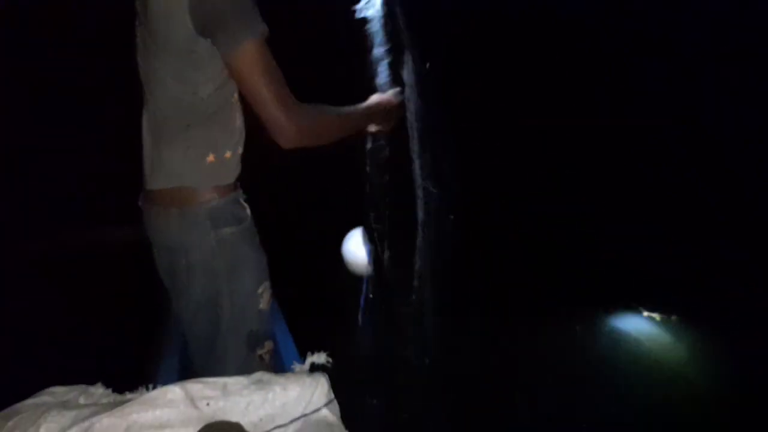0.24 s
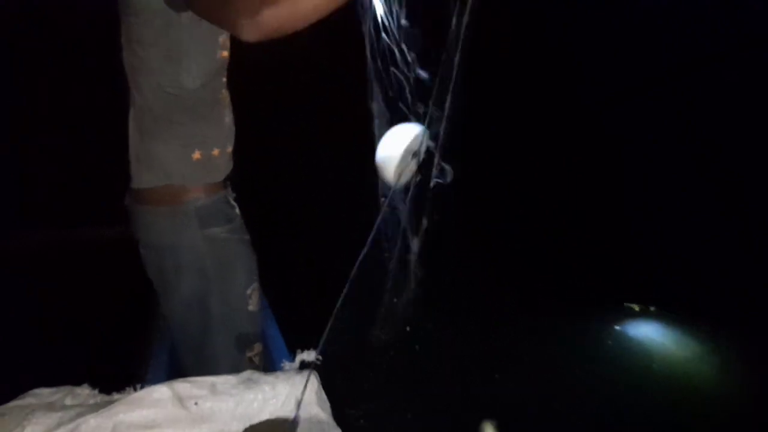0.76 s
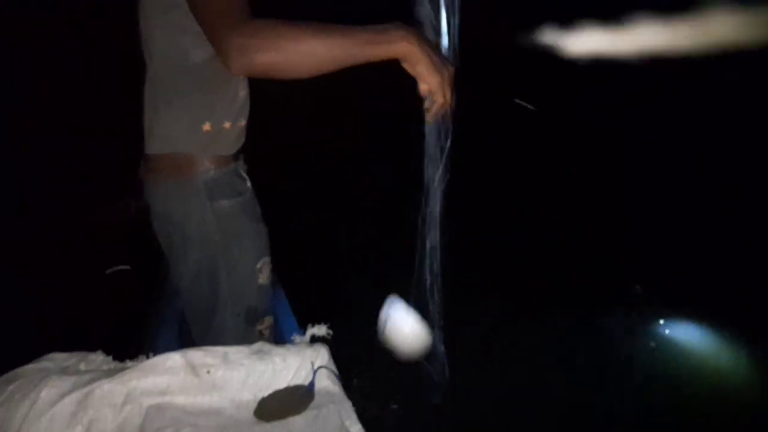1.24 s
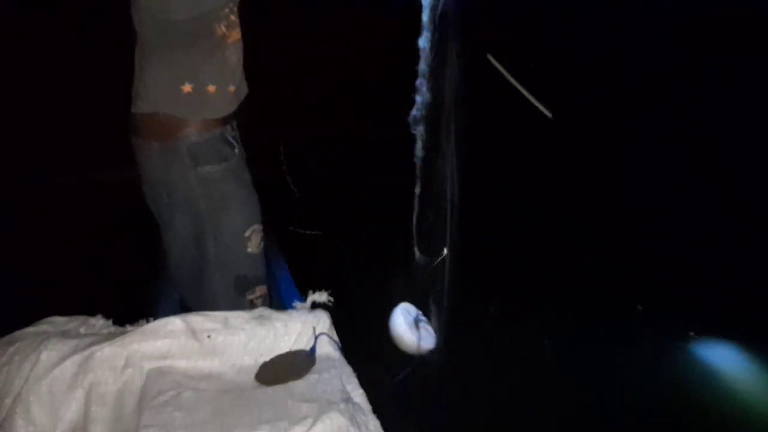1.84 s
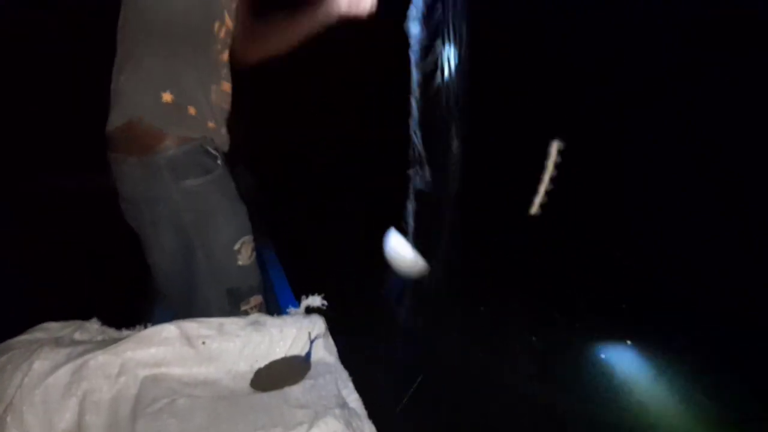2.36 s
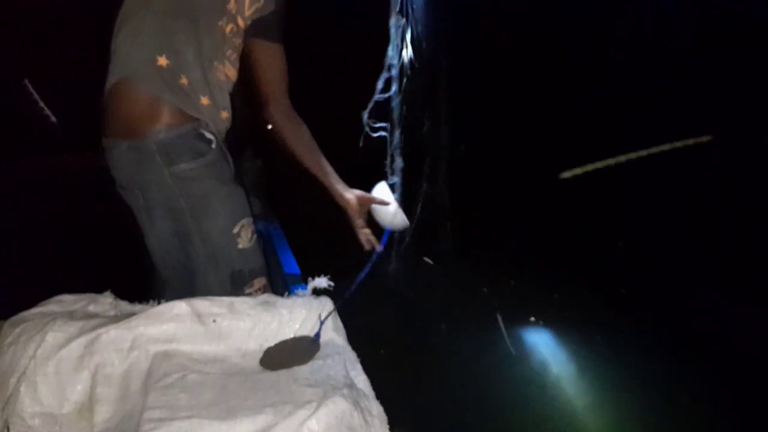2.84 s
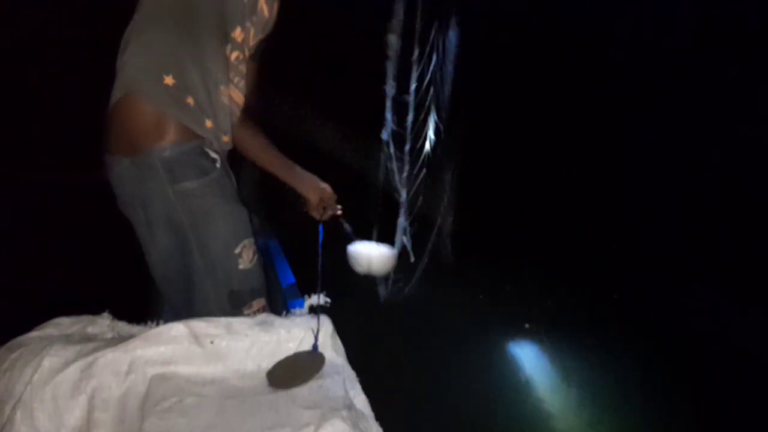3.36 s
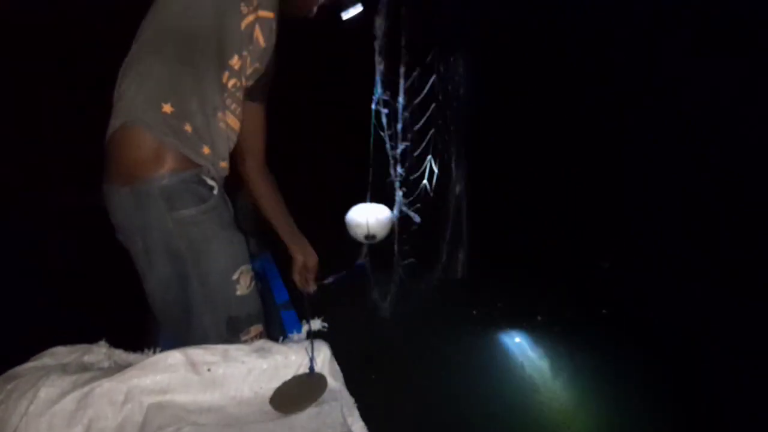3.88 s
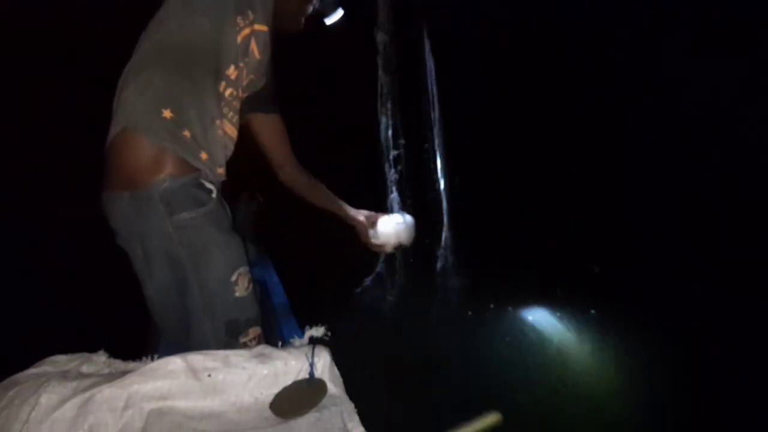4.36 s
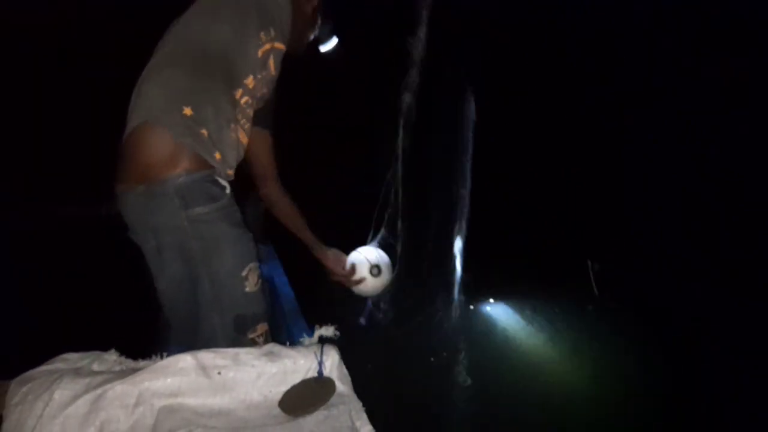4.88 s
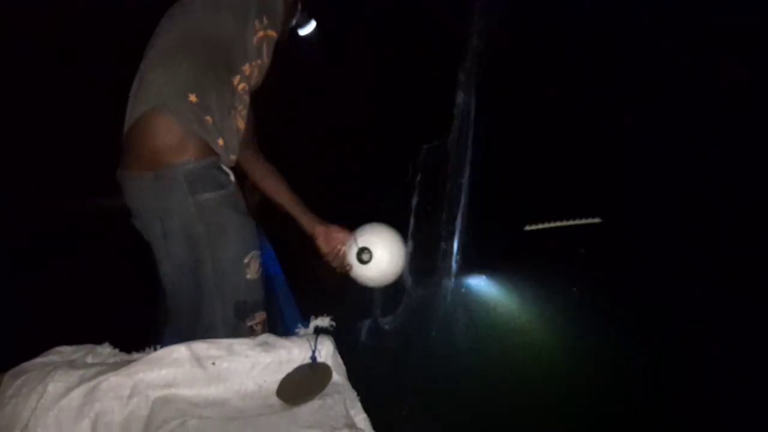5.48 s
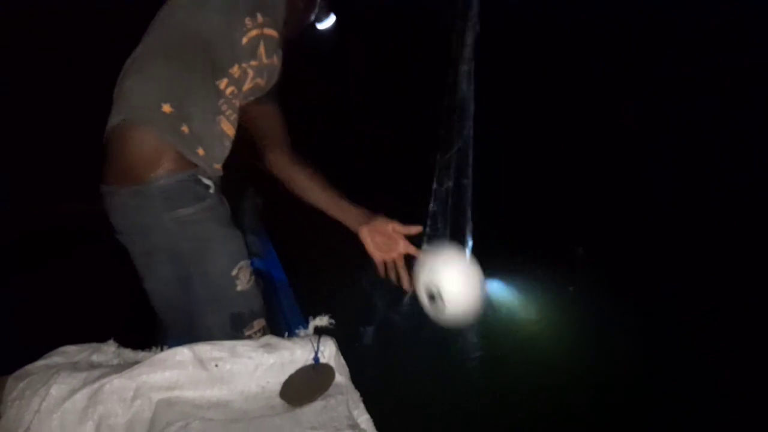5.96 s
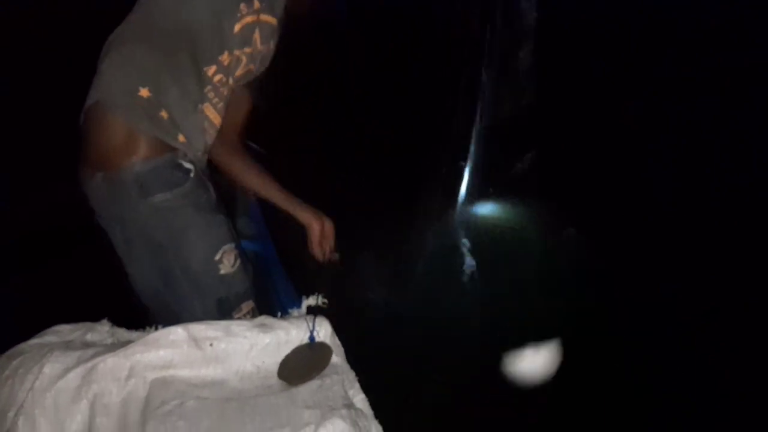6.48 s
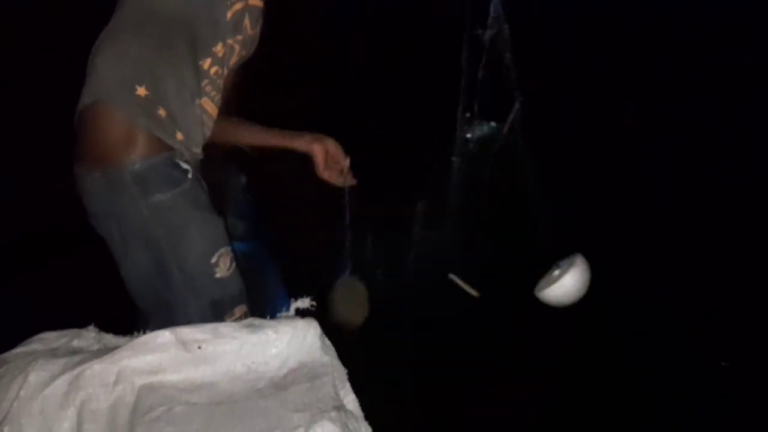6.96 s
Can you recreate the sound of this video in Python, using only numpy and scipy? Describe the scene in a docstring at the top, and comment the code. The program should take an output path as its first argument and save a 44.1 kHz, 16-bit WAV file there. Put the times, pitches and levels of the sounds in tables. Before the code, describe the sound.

Wet fishing net rustles and sprays as it is hauled into a small boat at night, strands snapping, folds slapping the hull, crickets chirping steadily.

```python
"""A wet fishing net is hauled by hand into a small boat on a river at night.
From the start: mesh rustle and spray (filtered clicks), low rumble and open air (shaped noise), and insects
on the right bank (swelling, falling tones and shaped noise). Drops (rising tones and splats) fall throughout.
Strands then snap (noise bursts) and wet folds slap the hull (ringing modes and squelch).
Later a plastic float knocks (scraped modes) and a cord swishes (narrow resonances of noise)."""
import sys
import numpy as np
from scipy import signal
from scipy.fft import rfft, irfft
from scipy.io import wavfile
from scipy.ndimage import uniform_filter1d

SR = 44100
rng = np.random.default_rng(int(sys.argv[2]) if len(sys.argv) > 2 else 0)


def materialize(psi):
    """Save the field psi as 16-bit PCM at rate SR to the path in sys.argv[1].

    A 1-D psi becomes a single channel; in a 2-D psi each row is a channel.
    """
    bounded = np.clip(np.atleast_2d(psi).T, -1, 1)
    quanta = np.round(bounded * 32767).astype(np.int16)
    wavfile.write(sys.argv[1], SR, quanta)


N = 318132
TIME = np.arange(N) / SR


def amp(db):
    """Amplitude factor of a level in dB."""
    return 10 ** (np.asarray(db) / 20)


def unit(x):
    """Scale to RMS 1."""
    return x / np.sqrt(np.mean(x ** 2))


def colour(x, points):
    """Filter by a spectrum of (Hz, dB) points, joined over log frequency."""
    hz, db = np.transpose(points)
    f = np.maximum(np.fft.rfftfreq(N, 1 / SR), 1)
    gain = amp(np.interp(np.log(f), np.log(hz), db))
    return irfft(rfft(x) * gain, N)


def resonate(x, hz, width_hz):
    """One resonance, gain 1 at its centre."""
    return signal.lfilter(*signal.iirpeak(hz, hz / width_hz, SR), x)


def walk(rate_hz):
    """Slow random curve, RMS 1."""
    k = int(SR / rate_hz)
    steps = np.repeat(rng.standard_normal(N // k + 1), k)
    return unit(uniform_filter1d(steps, k)[:N])


def pan(left_minus_right_db):
    """Gains of the two channels for a level difference."""
    return amp(np.array([[left_minus_right_db], [-left_minus_right_db]]) / 2)


def noise(alike, size=N):
    """Two channels of white noise; alike is the shared share of power, 0 to 1."""
    shared, *own = rng.standard_normal((3, size))
    return np.sqrt(alike) * shared + np.sqrt(1 - alike) * np.array(own)


def density_noise(alike, points):
    """Noise shaped by a density of (Hz, dB per Hz) points."""
    return colour(noise(alike), points) * np.sqrt(SR / 2)


def add(track, s, sound):
    """Mix a sound in at time s."""
    i = max(int(s * SR), 0)
    part = sound[..., :max(N - i, 0)]
    track[..., i:i + part.shape[-1]] += part


def scatter(x, t60_s, wet_db):
    """Diffuse reflections from boat, water and bank, different at each ear."""
    t = TIME[:SR // 2]
    tail = noise(0, size=len(t)) * amp(-60 * t / t60_s)
    tail /= np.sqrt(np.sum(tail ** 2, axis=1, keepdims=True))
    wet = signal.fftconvolve(np.atleast_2d(x), tail, axes=1)[:, :N]
    return x + amp(wet_db) * wet


def crackle(rate_hz, spread_db, alike):
    """Dense tiny clicks of very unequal size."""
    sizes = amp(spread_db * np.minimum(rng.exponential(size=N), 4))
    hits = rng.random(N) < rate_hz / SR
    return unit(noise(alike) * sizes * hits)


def ring(modes, t, fall_db_per_decade=0, detune=0.049):
    """Modes of a struck body; each blow wakes them a little differently."""
    hz, db, t60_s = np.transpose(modes)[:, :, None]
    chance = rng.standard_normal((2, len(modes), 1))
    tilt_db = -fall_db_per_decade * np.log10(hz / hz[0])
    gain = amp(db + 2 * chance[0] + tilt_db - 60 * t / t60_s)
    return np.sum(gain * np.sin(2 * np.pi * hz * (1 + detune * chance[1]) * t), axis=0)


def stroke(hz, fall, length_s):
    """One wing stroke of an insect: a quickly swelling tone that sinks as the wing slows."""
    u = np.linspace(0, 1, int(length_s * SR))
    phase = 2 * np.pi * np.cumsum(hz * (1 - fall * u ** 1.5)) / SR
    return np.sin(np.pi * u ** .75) * np.sin(phase)


def strike(t, rise_s, t60_s):
    """Envelope of a wet contact: a short swell, then a decay."""
    return (1 - np.exp(-t / rise_s)) * amp(-60 * t / t60_s)


def beats(first_s, last_s, rate_hz):
    """Evenly spaced times from first to last, at about this rate."""
    return np.linspace(first_s, last_s, int(round((last_s - first_s) * rate_hz)) + 1)


def slide(start_s, rise_s, hold_s, swell_db=21, t60_s=0.21):
    """Envelope of a length of net: it swells as it gathers speed, runs, and fades when let go."""
    t = np.maximum(TIME - start_s, 0)
    swell = -swell_db * np.maximum(1 - t / rise_s, 0)
    fade = -60 * np.maximum(t - rise_s - hold_s, 0) / t60_s
    return amp(swell + fade) * (t > 0)


# Lengths of net sliding through the hands. Each row: start in seconds, gathering speed in seconds,
# at full speed in seconds, mesh rustle in dB, spray in dB, both before trim.
PULLS = [(0.0, .02, 0.065, -57, -68), (0.170, 0.005, 0.17, -60, -57.5), (0.18, 0.23, .11, -45, -51),
         (0.45, 0.11, 0.022, -41, -48), (0.558, 0.012, .004, -43, -54.5), (0.599, 0.04, 0.25, -41.5, -43),
         (0.733, .008, 0.0075, -66, -43.5), (0.98, 0.063, 0.27, -68, -62), (3.293, 0.0072, 0.22, -51, -51),
         (3.33, 0.077, .008, -49, -56), (3.72, .04, .36, -67.5, -65), (4.935, 0.01, .015, -48, -60),
         (4.97, .05, 0.38, -63.5, -53), (5.14, 0.15, 0.028, -53, -52), (6.36, .12, .04, -67, -63),
         (6.682, 0.13, 0.034, -41.5, -48.5), (6.874, 0.044, 0.0091, -40, -45.5)]
# Rustle spectrum. Each row: frequency in Hz, relative level in dB.
MESH_SPECTRUM = [(60, 8), (140, 1.5), (300, 6), (550, -1.5), (820, 5.5), (1200, -2), (1900, 2.5), (2700, 1),
                 (3700, -6.5), (5300, -0.5), (8000, -34), (15000, -28)]
# Rustle placement. Each row: frequency in Hz, left minus right in dB.
MESH_PAN = [(150, -4), (700, 0.5), (1200, 17.5), (2400, -16), (5000, -12.5)]
# Spray spectrum. Each row: frequency in Hz, relative level in dB.
SPRAY_SPECTRUM = [(1000, -19), (2800, 2.5), (3700, -2.5), (5200, 5), (7000, -2), (10000, -0.5), (12000, 5),
                  (15000, 3)]


def net(count=7):
    """Wet strands of every thickness rub, each in its own band, and shed a fizz of fine spray."""
    mesh_gain, spray_gain = 0, 0
    for start_s, rise_s, hold_s, mesh_db, spray_db in PULLS:
        pull = slide(start_s, rise_s, hold_s)
        mesh_gain = mesh_gain + amp(mesh_db) * pull
        spray_gain = spray_gain + amp(spray_db) * pull
    mesh = 0
    for hz in np.geomspace(130, 5200, count):
        strands = resonate(crackle(rate_hz=2500, spread_db=2.0, alike=0.63), hz, 0.52 * hz)
        mesh = mesh + strands * amp(2.0 * walk(70)) * pan(np.interp(hz, *np.transpose(MESH_PAN)))
    mesh = unit(colour(mesh, MESH_SPECTRUM)) * mesh_gain * amp(3.5 + 2.1 * walk(60))
    spray = unit(colour(crackle(rate_hz=12000, spread_db=2.5, alike=0.059), SPRAY_SPECTRUM))
    return mesh + spray * spray_gain * amp(9.5 + 1.2 * walk(50)) * pan(-3.5)


# Rumble spectrum. Each row: frequency in Hz, density in dB per Hz before the level curve.
RUMBLE_SPECTRUM = [(20, -85), (40, -74.5), (58, -72.5), (76, -69.5), (105, -74.5), (170, -88.5),
                   (280, -90.5), (500, -102), (1500, -120)]
# Rumble level curve. Each row: time in seconds, gain in dB.
RUMBLE_LEVEL = [(0, 0), (2.9, 0.5), (3.7, 2), (5.7, 3.5), (6.15, -2), (7.2, 4)]


def rumble():
    """Low noise, nearly alike in both channels, with an unsteady level."""
    level_db = np.interp(TIME, *np.transpose(RUMBLE_LEVEL))
    return density_noise(0.88, RUMBLE_SPECTRUM) * amp(level_db + 2.0 * walk(8.8))


# Open air. Each row: frequency in Hz, mean density in dB per Hz.
AIR_SPECTRUM = [(100, -92), (280, -88), (500, -95), (820, -92.5), (1300, -99), (3000, -99), (6000, -102),
                (8500, -98), (10500, -106), (15000, -106)]


def open_air():
    """Wide, faint noise with a slightly wavering level."""
    return density_noise(0.15, AIR_SPECTRUM) * amp(1.0 * walk(20))


# Far insects. Each row: frequency in Hz, mean density in dB per Hz before panning.
CHORUS_SPECTRUM = [(1200, -116), (2100, -100), (2800, -91), (3200, -87.5), (3650, -99), (4350, -87.5),
                   (5000, -92.5), (6100, -98), (8000, -103), (9600, -91.5), (10400, -100), (12500, -96.5),
                   (15000, -102)]


def far_insects():
    """Many insects blur into peaked noise that shimmers on the right bank."""
    shimmer_db = 1.42 * walk(6) + 2.22 * walk(70)
    return density_noise(0.071, CHORUS_SPECTRUM) * amp(shimmer_db) * pan(-10.5)


# Stretches of even chirping. Each row: first chirp in seconds, last chirp in seconds, relative strength in dB.
CHIRPS = [(0.049, 0.508, -4), (0.619, 1.610, -1.5), (1.729, 4.857, 0), (4.976, 5.973, -1.5),
          (6.272, 7.153, -3.5)]


def near_cricket(chirps_hz=8.95, level_db=-41):
    """Two falling wing strokes a chirp, about nine chirps a second."""
    out = np.zeros(N)
    for first_s, last_s, db in CHIRPS:
        for s in beats(first_s, last_s, chirps_hz):
            a, b = rng.standard_normal(2)
            opening = stroke(hz=4690 + 25 * a, fall=0.16, length_s=0.01355)
            closing = stroke(hz=4640 + 25 * b, fall=0.14, length_s=0.0144)
            add(out, s - .0050, amp(db + .8 * a) * opening)
            add(out, s + .0122, amp(db + 0.94 * b) * closing)
    out += amp(-7.5) * np.roll(out, int(.0036 * SR))  # mirrored by the water
    return scatter(out, t60_s=.15, wet_db=-11) * amp(level_db) * pan(-9.0)


# Stretches of evenly spaced bursts. Each row: first burst in seconds, last burst in seconds.
BURSTS = [(0.051, 2.273), (2.394, 4.441), (4.568, 5.457), (5.580, 7.181)]


def bush_cricket(count=9, bursts_hz=8.15, ticks_hz=128):
    """Bursts of thin high ticks that swell and fade."""
    out = np.zeros(N)
    for s in np.concatenate([beats(first_s, last_s, bursts_hz) for first_s, last_s in BURSTS]):
        for k, (a, b) in enumerate(rng.standard_normal((count, 2))):
            place = k - (count - 1) / 2
            tick_s = s + place / ticks_hz + 0.00034 * a
            gain = amp(-49.5 - 0.1 * place ** 2 + 1.0 * b)
            add(out, tick_s, gain * stroke(hz=9760, fall=0.063, length_s=0.0038))
    return scatter(out, t60_s=0.19, wet_db=-11) * pan(-13.5)


# Stretches of evenly spaced runs of ticks. Each row: first run in seconds, last run in seconds.
RUNS = [(0.10, 3.24), (3.69, 3.69), (4.105, 6.99)]


def far_cricket(count=4, runs_hz=3.8, tick_gap_s=0.038):
    """A fainter cricket ticks in short runs."""
    out = np.zeros(N)
    for s in np.concatenate([beats(first_s, last_s, runs_hz) for first_s, last_s in RUNS]):
        for k in range(count):
            tick = stroke(hz=6450 + rng.normal(0, 45), fall=0.055, length_s=0.013)
            add(out, s + k * tick_gap_s - .004, amp(rng.normal(0, 2.8)) * tick)
    return scatter(out, t60_s=0.11, wet_db=4) * amp(-58.5) * pan(-4)


# Larger drops falling on the river. Each row: time in seconds, starting bubble pitch in Hz.
DRIPS = [(1.072, 3030), (1.418, 1720), (1.488, 920), (1.792, 1260), (1.907, 850), (2.704, 1900),
         (3.155, 1030), (3.185, 860), (3.743, 1330), (4.191, 1650), (4.361, 980), (4.451, 1020),
         (4.588, 1350), (4.718, 1020)]


def drips(level_db=-47.5, small_count=60):
    """Each drop splats and traps a bubble whose pitch rises as it dies; random ones patter in between."""
    out, t = np.zeros(N), TIME[:SR // 10]
    drops = [(s, level_db, hz) for s, hz in DRIPS]
    for a, b, c in rng.random((small_count, 3)):
        drops.append((a * TIME[-1], -60 + 7 * b, 850 * 2 ** (1.2 * c)))
    for s, db, hz in drops:
        bubble = np.sin(2 * np.pi * hz * t * (1 + 2.4 * t)) * strike(t, rise_s=0.0016, t60_s=0.039)
        splat = resonate(rng.standard_normal(len(t)), 1.37 * hz, 1.9 * hz)
        splat = splat * strike(t, rise_s=0.00089, t60_s=0.027)
        add(out, s, amp(db) * (amp(-5.5) * bubble + amp(10.0) * splat))
    return scatter(out, t60_s=0.13, wet_db=3.5) * pan(-0.88)


# Strands snapping free. Each row: time in seconds, level in dB, treble share in dB, both before trim.
SNAPS = [(0.177, -34, -6), (0.552, -12, -23), (0.572, -17, -20), (0.874, -19.5, -24), (1.072, -35, -15),
         (3.298, -40, -10), (3.396, -23, -33), (4.591, -33, -4.5), (5.492, -49, -2), (6.697, -32, -6),
         (6.761, -40, -4), (6.787, -23, -17), (6.842, -28, -24), (6.877, -25, -15), (6.897, -16, -16.5),
         (6.928, -26.5, -1.5)]


def snaps():
    """A taut strand slips free with a short wet crack."""
    out, t = np.zeros((2, N)), TIME[:SR // 10]
    crack = strike(t, rise_s=0.00044, t60_s=0.011) + amp(-16.0) * strike(t, rise_s=0.0035, t60_s=0.12)
    for s, db, treble_db in SNAPS:
        burst = noise(0.22, size=len(t)) * crack
        body = resonate(resonate(burst, 2200, 4000), 2700, 8600)
        fizz = resonate(burst, 12000, 5600)
        add(out, s - .0007, amp(db) * pan(-6) * (amp(2.5) * body + amp(treble_db + 17.0) * fizz))
    return out


# Heavy wet folds landing in the boat. Each row: time in seconds, level in dB before trim,
# weight in dB per decade of fall above the lowest hull mode.
SLAPS = [(0.690, -25.5, 7), (0.739, -14.5, -3.5), (0.757, -22.5, -10), (0.821, -18, -3.5), (0.863, -22, 18),
         (0.885, -26, 10), (3.545, -36, 22), (6.772, -26, 11), (6.797, -17, 3), (6.825, -17, 32),
         (6.897, -16.5, 8.5), (6.921, -29, 4)]
# Hull modes. Each row: mean frequency in Hz, mean relative level in dB, t60 in seconds.
HULL = [(86.1, -9.5, 0.27), (119, 1, 0.12), (143.4, -9, 0.2), (234.7, -7, 0.13), (307, -1.5, 0.1),
        (377.5, -4.5, 0.068), (663, -5, 0.038), (789, -4, 0.066), (1063, -14.5, 0.043)]


def slaps():
    """Soft heavy folds boom the hull and squelch as they settle."""
    out, t = np.zeros((2, N)), TIME[:SR // 4]
    for s, db, weight_db in SLAPS:
        boom = ring(HULL, t, fall_db_per_decade=weight_db) * (1 - np.exp(-t / 0.0027))
        boom = boom / np.abs(boom).max()
        squelch = resonate(noise(0.85, size=len(t)), 360, 430) * strike(t, rise_s=0.0047, t60_s=0.092)
        squelch = squelch * amp(-weight_db / 2)  # heavier folds squelch less
        add(out, s - .001, amp(db) * (amp(-3.5) * boom + amp(2.0) * squelch * pan(5.9)))
    return out


# The plastic float knocking on its line. Each row: time in seconds, level in dB before trim.
KNOCKS = [(1.900, -37.5), (4.796, -31), (4.852, -33.5), (4.871, -35.5), (4.913, -23.5), (4.928, -27),
          (4.947, -39), (4.961, -35), (4.974, -40), (5.521, -40), (5.546, -37.5)]
# Float modes. Each row: mean frequency in Hz, mean relative level in dB, t60 in seconds.
FLOAT_MODES = [(858, -9, 0.13), (1074, -0.5, 0.025), (1560, -8, 0.011), (2130, 3, 0.0061), (2750, 3, 0.01),
               (2810, 4, .016), (4880, 6.5, 0.01), (5330, -2, 0.013)]


def float_knocks(rebound_s=0.0055, rebound_db=1):
    """The hollow float clacks and bounces once as it is caught and turned; each contact scrapes."""
    out, t = np.zeros((2, N)), TIME[:SR // 10]
    bounces = [(s + rebound_s, db + rebound_db) for s, db in KNOCKS]
    for s, db in [*KNOCKS, *bounces]:
        contact = noise(0.59, size=len(t)) * strike(t, rise_s=.001, t60_s=0.0073)
        shell = ring(FLOAT_MODES, t, detune=0.065)[None]
        clack = signal.fftconvolve(contact, shell, axes=1)[:, :len(t)]
        scrape = resonate(resonate(contact, 1500, 2600), 1500, 2900)
        add(out, s - .001, amp(db) * (clack / np.abs(clack).max() + amp(4) * scrape))
    return scatter(out, t60_s=0.16, wet_db=-3.5) * pan(-4)


# Cord resonances. Each row: frequency in Hz, half-width of each of two passes in Hz, relative level in dB.
CORD = [(2604, 82, -0.5), (3018, 170, 4), (3260, 210, -2.5), (3850, 490, -6), (4770, 300, -6.5),
        (5060, 370, -8), (7040, 830, -12.5), (9000, 1150, -17), (12800, 1700, -17.5)]


def cord(start_s=2.073, level_db=-27, rise_s=0.018, hold_s=0.037, t60_s=0.38, tail_db=-17, tail_t60_s=0.85):
    """A cord jerks through the mesh; its fibres catch and slip in a narrow hiss that trails off."""
    t = np.maximum(TIME - start_s, 0)
    slowing = np.maximum(t - hold_s, 0)
    fade = amp(-60 * slowing / t60_s) + amp(tail_db - 60 * slowing / tail_t60_s)
    jerk = (1 - np.exp(-t / rise_s)) * fade * amp(level_db)
    rub = noise(0.19) * amp(1.2 * walk(200))
    hiss = 0
    for hz, half_width_hz, db in CORD:
        once = resonate(rub, hz, 2 * half_width_hz)
        hiss = hiss + amp(db) * resonate(once, hz, 2 * half_width_hz)
    low_hiss = unit(resonate(resonate(rub, 2230, 820), 2230, 820))
    return (unit(hiss) + amp(-27) * low_hiss) * jerk * pan(-9)


def scene():
    """All the layers together."""
    night = rumble() + open_air() + far_insects()
    insects = near_cricket() + bush_cricket() + far_cricket()
    return net() + night + insects + drips() + snaps() + slaps() + float_knocks() + cord()


# Microphone response. Each row: frequency in Hz, gain in dB.
MICROPHONE = [(20, -1), (6100, -1), (7000, -8.5), (7800, -9), (8900, -5.5), (10000, -2), (13000, -4.5),
              (15000, -13)]


def record(dry, left_hz=70, right_hz=28, top_hz=15400):
    """Two microphones thin the bass unequally, their ports hollow the upper treble; the top is cut."""
    bass_cut = signal.butter(4, 49, "high", fs=SR, output="sos")
    ported = signal.sosfilt(bass_cut, colour(dry, MICROPHONE))
    thin = [signal.lfilter(*signal.butter(1, hz, "high", fs=SR), x)
            for x, hz in zip(ported, (left_hz, right_hz))]
    return signal.sosfilt(signal.ellip(10, .2, 70, top_hz, fs=SR, output="sos"), thin)


dry = scene()
out = record(dry)
materialize(out)
```